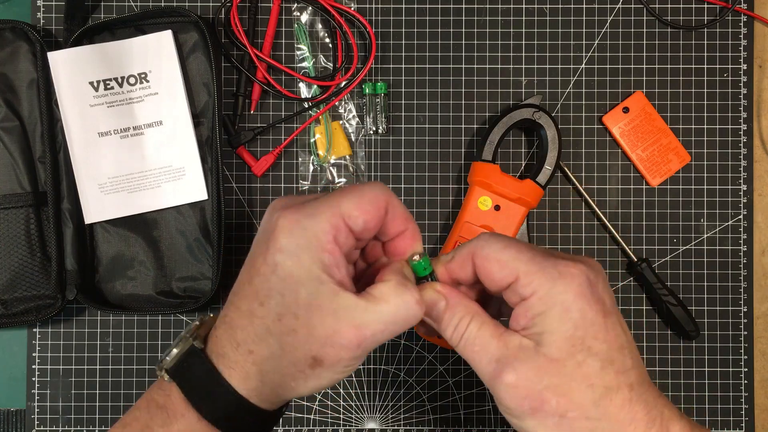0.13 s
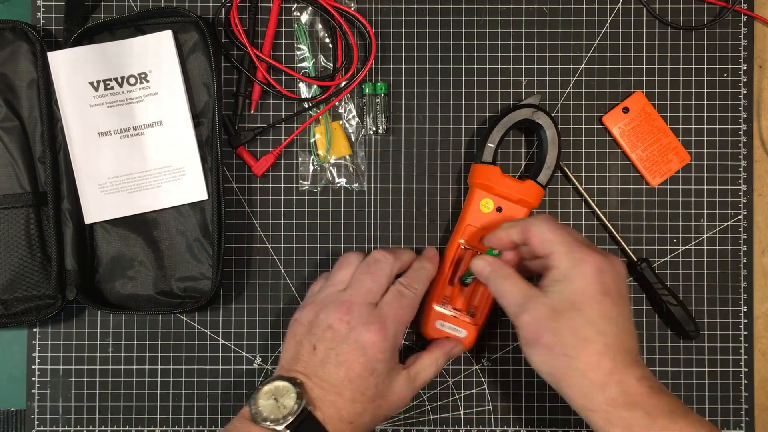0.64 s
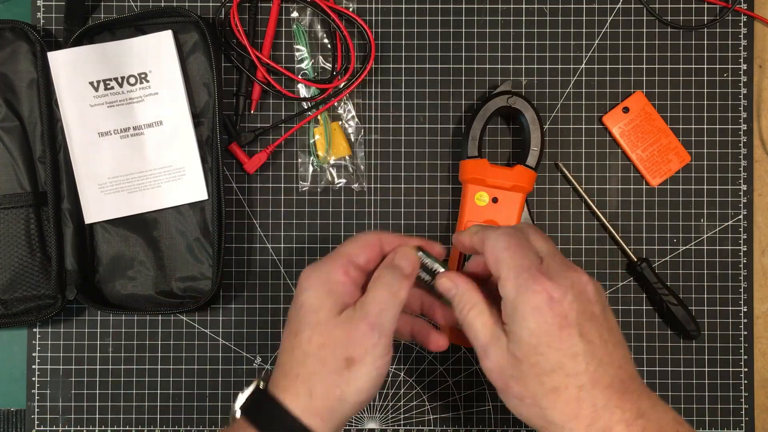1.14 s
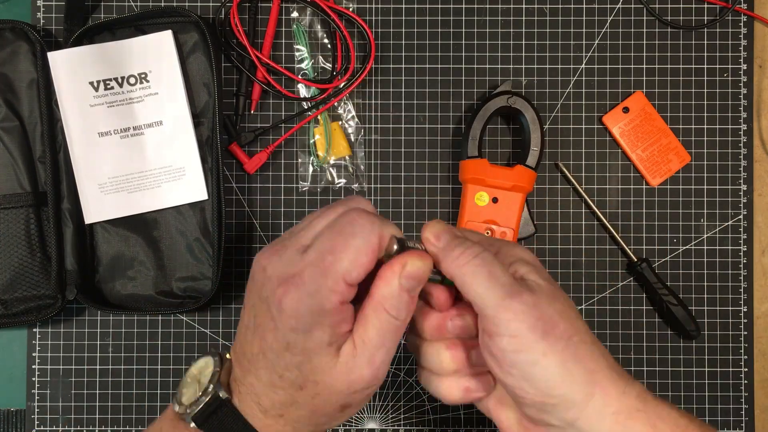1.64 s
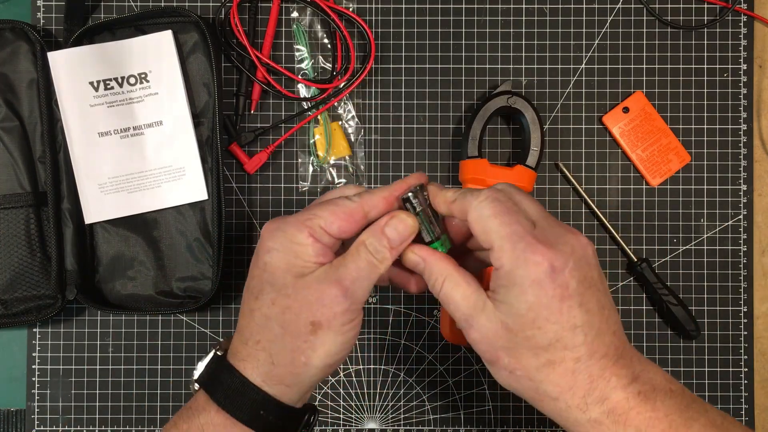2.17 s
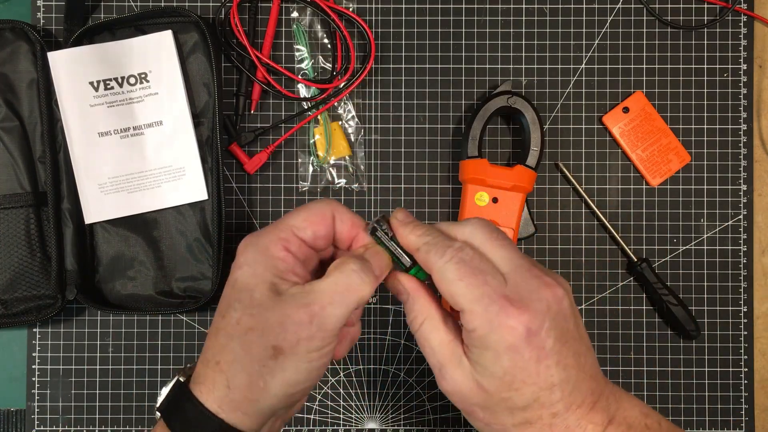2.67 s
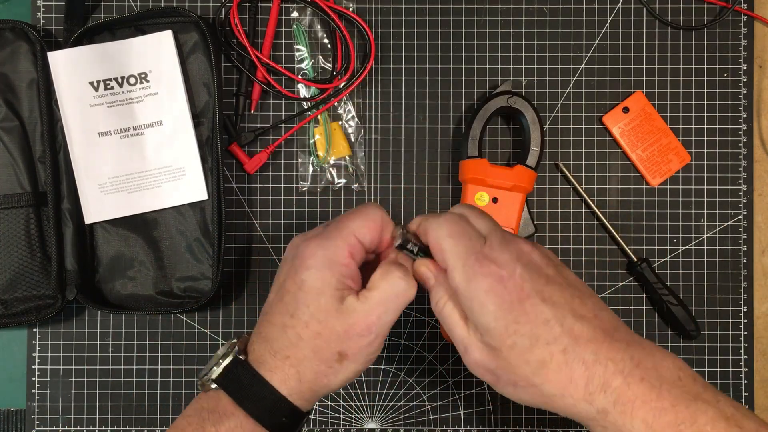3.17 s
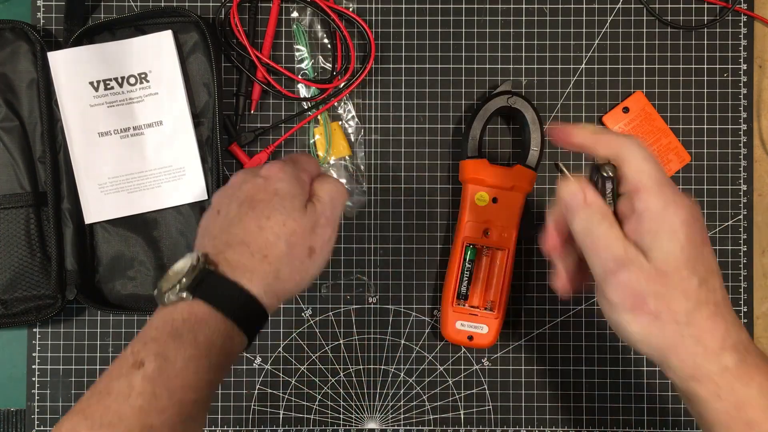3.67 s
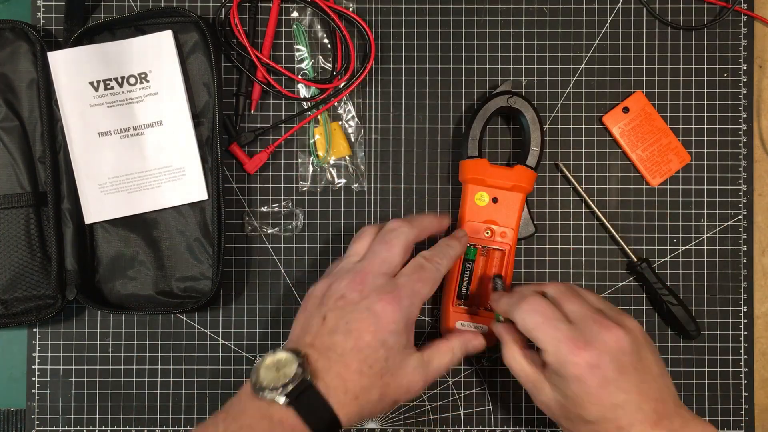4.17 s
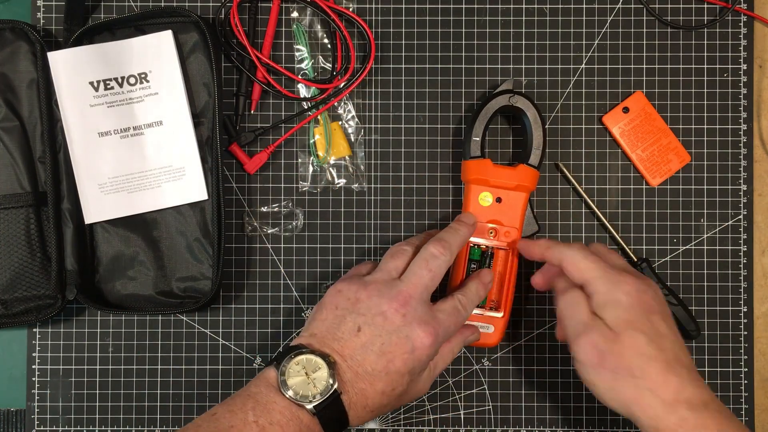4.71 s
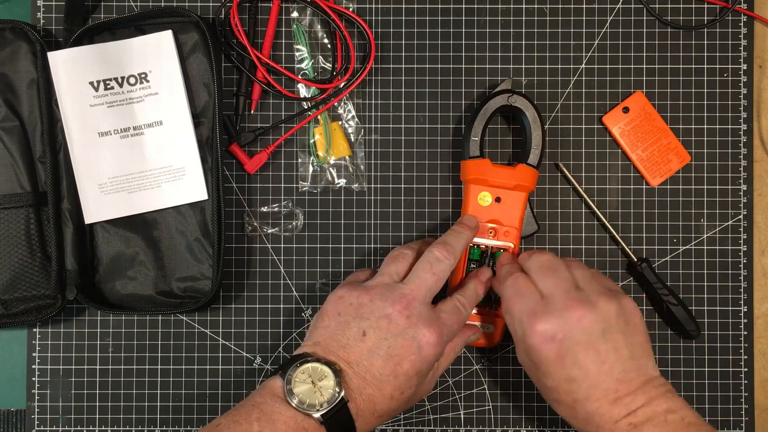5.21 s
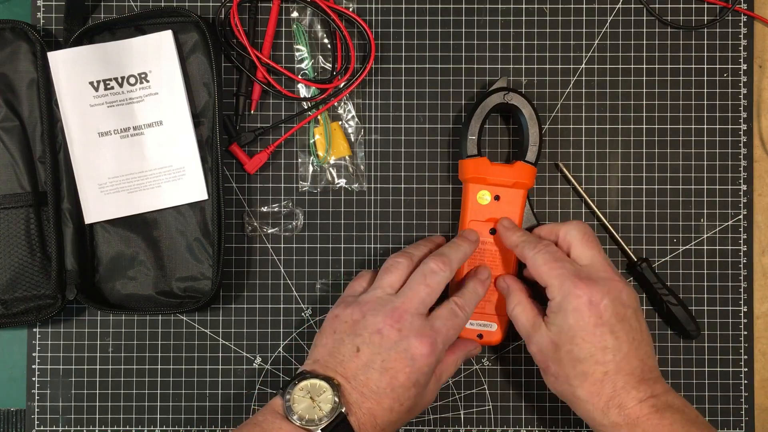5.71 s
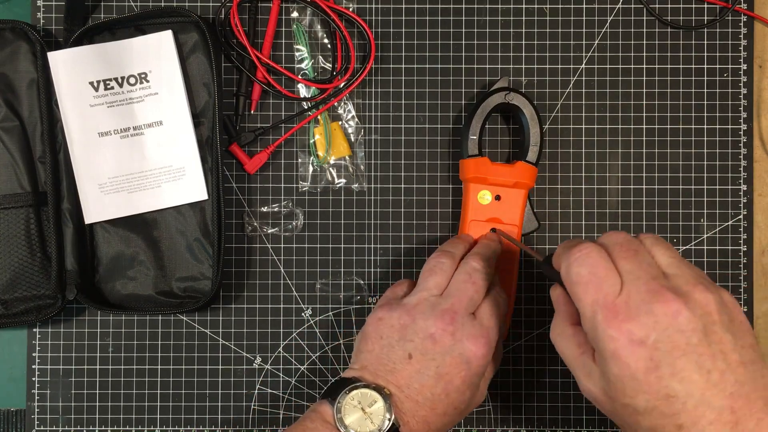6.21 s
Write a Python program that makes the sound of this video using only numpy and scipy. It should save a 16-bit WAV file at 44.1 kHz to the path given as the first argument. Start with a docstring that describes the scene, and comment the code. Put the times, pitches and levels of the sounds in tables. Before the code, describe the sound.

Thin plastic film crackles and snaps off small batteries, which then clack into a hollow plastic case with dull table thuds over a steady low hum.

```python
"""At a table with a mat, hands tear shrink film off small batteries, press them into a plastic case,
fit the lid and lift a screwdriver. Film creases and rustle are noise bursts in four bands, with a ringing patch.
Knocks excite the modes of a hollow case, and thuds bend the table top with decaying sines.
Every click comes as a short smeared burst. A mains hum and a faint room hiss lie under it."""
import sys
import numpy as np
from scipy import signal
from scipy.fft import rfft, irfft
from scipy.io import wavfile
from scipy.ndimage import uniform_filter1d

SR = 44100
rng = np.random.default_rng(int(sys.argv[2]) if len(sys.argv) > 2 else 0)


def field_ratio(decibels):
    """Amplitude ratio for a level in dB (20 dB per decade); scalars and array-likes work."""
    return 10 ** (np.asarray(decibels, dtype=float) / 20)


def to_wav(sig):
    """Store sig (one row per channel, or 1-D mono) as 16-bit WAV at the path in sys.argv[1].

    Samples outside -1..1 are clipped; the rate is SR.
    """
    pcm = np.clip(np.atleast_2d(sig), -1, 1) * 32767
    pcm = np.round(pcm).astype(np.int16)
    wavfile.write(sys.argv[1], SR, pcm.T)  # frames by channels


N = 279575
TIME = np.arange(N) / SR


def band(x, lo_hz, hi_hz, order=2):
    """Band-pass filtering: a Butterworth filter keeps the range between two edges."""
    return signal.sosfilt(signal.butter(order, [lo_hz, hi_hz], "bandpass", fs=SR, output="sos"), x)


def unit_band(x, lo_hz, hi_hz, order=2):
    """Noise gain: the energy of the impulse response sets the scale, so unit white noise leaves with rms 1."""
    click = np.zeros(4096)
    click[0] = 1
    response = band(click, lo_hz, hi_hz, order)
    return band(x, lo_hz, hi_hz, order) / np.sqrt(np.sum(response ** 2))


def walk(rate_hz):
    """Slow random modulation: levels held for 1 / rate_hz are smoothed twice; spread 1."""
    hold = int(SR / rate_hz)
    x = np.repeat(rng.standard_normal(N // hold + 1), hold)
    x = uniform_filter1d(uniform_filter1d(x, hold), hold)[:N]
    return x / np.std(x)


def grit(rate_hz, spread_db):
    """Granular excitation: dense tiny impacts of uneven size make noise of wavering level; rms 1."""
    x = rng.standard_normal(N) * field_ratio(spread_db * walk(rate_hz))
    return x / np.std(x)


def bursts(times, dbs, lengths_ms, late_ms, skirt_db, skirt_ms):
    """Energy summation of smeared clicks: each has a rounded core on a wider skirt that starts before it."""
    power, half = np.zeros(N), SR // 16
    for s, db, fall_ms in zip(times, dbs, lengths_ms):
        i = np.arange(max(int(s * SR) - half, 0), min(int(s * SR) + half, N))
        t_ms = (i / SR - s) * 1000 - late_ms
        width_ms = np.where(t_ms < 0, 2.5, max(fall_ms, 1))
        core = np.exp(-.5 * (t_ms / width_ms) ** 2)
        skirt = field_ratio(skirt_db) * np.exp(-.5 * (t_ms / skirt_ms) ** 2)
        power[i] += field_ratio(db) ** 2 * (core ** 2 + skirt ** 2)
    return np.sqrt(power)


def ring_each(push, times, pitches_hz, lows_hz, highs_hz, order):
    """Resonance: around each event the push passes a narrow band at that event's own pitch."""
    out = np.zeros(N)
    ends = (SR * np.r_[0, (times[1:] + times[:-1]) / 2, N / SR]).astype(int)  # halfway between events
    for a, b, lo, hi in zip(ends, ends[1:], lows_hz, highs_hz):
        out[a:b] = unit_band(push[a:b], lo, hi, order)
    return out


# Film creases. Each row: time in seconds, sizzle level in dB before trims,
# snap level in dB relative to the sizzle, ring level in dB relative to the sizzle before trims.
FILM_CREASES = [(0.027, -23, -13.5, -15), (0.113, -43.5, -16, -33), (0.277, -31, -13, -40),
                (0.296, -32.5, -15, -31), (0.344, -33, -8, -29), (0.361, -27.5, -11.5, -29),
                (0.3835, -34.5, -5, -36), (0.4005, -36.5, -5.5, -16.5), (0.474, -42, -14, -32),
                (0.5154, -34, -7, -19), (1.166, -56.5, 3.5, -12), (1.5076, -50, 8, 10),
                (1.5801, -19, -12.5, -23), (1.63, -27, -16, -39), (1.701, -27, -14, -22.5),
                (1.737, -36, -1.5, -13), (1.7817, -32, -12, -13.5), (2.0084, -39.5, -4, -11),
                (2.046, -33.5, 1, -5.5), (2.103, -39.5, -3, -11), (2.151, -33, -5, -9.5),
                (2.291, -43.5, -2, -7), (2.391, -32.5, -5, -11), (2.4686, -21.5, -3, -6.5),
                (2.542, -38, -3, -12), (2.64, -46.5, 2, -8), (2.724, -38, 1.5, -30), (2.765, -38, 2, -28),
                (2.89, -44.5, 2, 1), (2.942, -25.5, 1.5, -18.5), (2.97, -39, 4.5, 4),
                (2.992, -51.5, -4, 12.5), (3.023, -42, 6, -29), (3.0966, -36.5, 5, -12),
                (3.145, -19.5, -3, -19.5), (3.21, -27.5, 4, 2), (3.223, -40.5, 17, 13.5),
                (3.271, -34.5, -1, -24), (3.323, -47, 7.5, 2.5), (3.373, -20, -5.5, -15.5),
                (3.431, -26.5, -4, -13), (3.482, -33.5, 3, -0.5), (3.513, -21.5, -3, -14),
                (3.5873, -22.5, -8.5, -15.5), (3.6434, -23.5, 0, -5.5), (3.6623, -27, -2, -4),
                (3.747, -41, -18, -29), (3.829, -50.5, 9.5, -14)]
# Film rustle between creases. Each row: time in seconds, level in dB before trims.
FILM_RUSTLE = [(.1, -78), (.25, -72.5), (.33, -56.5), (.44, -78), (.54, -58.5), (.62, -78.5), (1.28, -75.5),
               (1.4, -68), (1.65, -59.5), (1.95, -60), (2.15, -60.5), (2.24, -70.5), (2.44, -60),
               (2.6, -65), (2.68, -59.5), (2.73, -53.5), (3.03, -54), (3.065, -57), (3.11, -51.5),
               (3.3, -53.5), (3.57, -44), (3.72, -64), (3.82, -53), (3.9, -88)]
# Sizzle, snap, body and low body of the film. Each row: lower edge in Hz, upper edge in Hz.
FILM_RANGES = [(10500, 16300), (4800, 10500), (2200, 4800), (950, 2200)]
# Flat film between the fingers, as the grip shifts. Each row: time in seconds, pitch in Hz before scatter.
FILM_PATCH = [(.03, 3500), (1.5, 2170), (1.75, 5000), (2.47, 2260), (2.7, 5470), (2.97, 3400), (2.99, 1510),
              (3.2, 4900), (3.49, 3680), (3.65, 6000)]


def film():
    """Buckling: creases in thin stiff film snap in flurries; many smaller ones crackle at random in the gaps."""
    s, peak_db, snap_db, ring_db = np.transpose(FILM_CREASES)
    patch_hz = np.interp(s, *np.transpose(FILM_PATCH))
    patch_hz = patch_hz * np.exp(0.091 * rng.standard_normal(len(s)))  # scatter as a share of the pitch

    def flurry(db):
        lengths_ms = np.full(len(s), 4.5)
        shape = bursts(s, db - 7.5, lengths_ms, late_ms=2.94, skirt_db=-13.0, skirt_ms=10.7)
        return grit(900, 1.02) * shape

    when, size, *tints = np.transpose(rng.random((640, 10)))
    when = when * N / SR
    rustle_points = np.transpose(FILM_RUSTLE)
    small_db = np.interp(when, *rustle_points) - 3.5 * np.log(size + .01)  # few large, many tiny
    rustle_db = np.interp(TIME, *rustle_points)

    out = np.zeros(N)
    crease_trims_db = (0, snap_db, ring_db - 3.5, ring_db - 11.0)
    rub_trims_db = (1, -1.5, -6, -11)
    tints = iter(tints)
    for (lo, hi), db, rub_db in zip(FILM_RANGES, crease_trims_db, rub_trims_db):
        middle = np.sqrt(lo * hi)
        for low_hz, high_hz in [(lo, middle), (middle, hi)]:  # each half has its own shade
            shade_db = small_db + rub_db - 1 - 15 * next(tints)
            small = bursts(when, shade_db, np.full(len(when), 2), late_ms=0, skirt_db=-13, skirt_ms=8)
            finest = field_ratio(rustle_db + rub_db - 13 + 6.0 * walk(60))  # finest ticks run together
            rustle = grit(1000, 0.81) * np.hypot(small, finest)
            creases = flurry(peak_db + db - 3.0 + 2.1 * rng.standard_normal(len(s)))
            out += unit_band(creases + rustle, low_hz, high_hz, order=3)
    # the flat patch beside each crease rings at a pitch set by its size
    push = flurry(peak_db + ring_db)
    return out + ring_each(push, s, patch_hz, patch_hz / 1.16, patch_hz * 1.16, order=2)


# Knocks on the case. Each row: time in seconds, level in dB before trims,
# tick level in dB relative to that level before trims, pitch of the spot struck in Hz.
CASE_KNOCKS = [(0.672, -32, -43, 560), (0.705, -40, -34, 1650), (0.76, -45.5, -31, 640),
               (0.813, -54, -4, 2600), (0.936, -32.5, -12.5, 3140), (1.021, -41, 11.5, 3200),
               (1.049, -49, -9, 1290), (1.07, -44, -0.5, 3010), (4.255, -30.5, -13, 2940),
               (4.27, -43.5, -30, 780), (4.354, -28.5, -33, 2510), (4.387, -39, -16, 1720),
               (4.576, -47, -28, 865), (4.622, -50.5, -17, 870), (4.662, -54, -5.5, 2370),
               (4.728, -48, -11, 3920), (5.086, -46.5, -21, 1750), (5.145, -49, -15, 3930),
               (5.215, -32.5, 8.5, 1990), (5.345, -35, 1, 1970), (5.367, -44.5, 1, 2400),
               (5.391, -40.5, -1.5, 2240), (5.506, -50, -23, 2000), (5.587, -23, -14, 2250),
               (5.707, -44.5, 2.5, 2300), (5.843, -51, -27, 770), (6.242, -61, 4.5, 2220)]
# Wall modes of the plastic case. Each row: pitch in Hz, level in dB before trims.
CASE_MODES = [(900, -6.5), (1520, -1), (1760, -4.5), (2160, 2), (2350, 0), (2700, 0), (3200, -2.5),
              (4150, -2.5), (4900, -2)]


def case():
    """Modal excitation: batteries, springs and lid knock a hollow shell into wall modes, clack and tick."""
    s, peak_db, tick_db, spot_hz = np.transpose(CASE_KNOCKS)
    hard_db = -31
    # a hard knock is short; softer ones fall more slowly, up to 8.8 ms
    lengths_ms = np.minimum(5.16 + 0.5 * (hard_db - peak_db), 8.8)

    def blow(db):
        return bursts(s, db, lengths_ms, late_ms=2.7, skirt_db=-9.5, skirt_ms=8.1)

    contact = grit(600, 2.7)  # several contacts to a knock
    # the spot struck rings briefly
    out = ring_each(contact * blow(peak_db - 14), s, spot_hz, spot_hz - 60, spot_hz + 60, order=1)

    grip = rng.standard_normal((len(s), len(CASE_MODES)))  # the fingers damp other modes at every knock
    for k, (hz, db) in enumerate(CASE_MODES):
        near_db = -7 * np.abs(np.log2(hz / spot_hz))  # the spot struck favours modes near its own pitch
        push = contact * blow(peak_db + db + near_db + 1.5 * grip[:, k] - 10)
        out = out + (-1) ** k * unit_band(push, hz / 1.04, hz * 1.04, order=1)

    # the part scrapes on into place
    slide_db = np.minimum(peak_db, hard_db) - 24
    slide = bursts(s, slide_db, np.full(len(s), 16), late_ms=11, skirt_db=-3, skirt_ms=18.3)
    out = out + unit_band(slide * grit(300, 3.5), 800, 4500)

    # many damped modes blur into a dull clack
    clack = contact * blow(peak_db - 11.5 - 1.32 * np.log2(spot_hz / 1500))
    tick = grit(500, 2.9) * blow(peak_db + tick_db - 6.0)
    return out + unit_band(clack, 170, 1100, order=1) + unit_band(tick, 3100, 15400)


# Thuds through the table top. Each row: start in seconds, level in dB before trims,
# board ring level in dB relative to the swing.
TABLE_THUDS = [(0.671, -42, 5), (0.686, -44, -3.5), (0.938, -29, -0.5), (4.287, -46.5, -9),
               (4.372, -43.5, -3), (4.542, -54, -8), (4.584, -48.5, -8.5), (4.735, -48.5, -16),
               (5.213, -36, -8.5), (5.342, -41, -6.5), (5.525, -39.5, -8.5), (5.59, -49, -1),
               (5.696, -41, -8), (5.805, -38, -12.5), (5.849, -35, -9.5), (6.233, -62.5, 9.5)]


def table():
    """Damped bending: each push gives a low swing that sinks in pitch and a shorter board ring, both eased in."""
    out, t = np.zeros(N + SR), np.arange(SR // 5) / SR
    sag_s = 0.0307  # time constant of the sinking pitch
    rise = 1 - np.exp(-(t / 0.0036) ** 2)
    chances = rng.standard_normal((len(TABLE_THUDS), 2))
    for (s, db, ring_db), (swing_chance, ring_chance) in zip(TABLE_THUDS, chances):
        start_hz = 150 * (1 + 0.12 * swing_chance)
        cycles = start_hz * sag_s * (1 - np.exp(-t / sag_s))
        swing = (1 - np.exp(-t / 0.007)) * np.sin(2 * np.pi * cycles) * np.exp(-t / 0.013)
        board_hz = 210 * (1 + 0.15 * ring_chance)
        ring = np.sin(2 * np.pi * board_hz * t) + np.sin(2 * np.pi * 310 * t)
        ring = ring * np.exp(-t / 0.0076)
        out[int(s * SR):][:len(t)] += field_ratio(db + 11.5) * rise * (swing + field_ratio(ring_db) * ring)
    return band(out[:N], 28, 2100, order=1)


# High overtones of the hum. Each row: frequency in Hz, level in dB rms.
HUM_OVERTONES = [(1981, -84.5), (2579, -84.5), (2934, -87)]


def hum():
    """Phase modulation: a mains tone wavers slightly in level and phase, with faint high overtones."""
    hum_hz, hum_db = 60, -42
    turn = 2 * np.pi * TIME
    out = field_ratio(hum_db + 0.38 * walk(14)) * np.sin(hum_hz * turn + 0.052 * walk(20))
    for hz, db in HUM_OVERTONES:
        out = out + field_ratio(db) * np.sin(hz * turn + 0.74 * walk(45))
    return np.sqrt(2) * out  # peak of a sine over its rms


# Spectrum of the hiss. Each row: frequency in Hz, relative density in dB per Hz.
ROOM_SPECTRUM = [(45, -22), (95, -9), (160, -16), (320, -15.5), (450, -23), (1200, -26), (2800, -31.5),
                 (4000, -36), (16000, -36.5)]


def room():
    """Spectral shaping: white noise weighted by frequency makes steady room and microphone hiss."""
    hz = np.fft.rfftfreq(N, 1 / SR)
    point_hz, point_db = np.transpose(ROOM_SPECTRUM)
    gain = field_ratio(np.interp(np.log(hz + 1), np.log(point_hz), point_db))
    x = irfft(rfft(rng.standard_normal(N)) * gain, N)
    return x / np.std(x) * field_ratio(-66)  # dB rms


def scene():
    """Superposition: the pressures of all sources add at one microphone."""
    return (film() + case() + table() + hum() + room())[None]


# Dips from the microphone's housing. Each row: centre in Hz, width in Hz, gain at the centre in dB.
HOUSING_DIPS = [(4980, 710, -7), (10650, 320, -10)]


def housing(x):
    """Cancellation: subtracting part of a band dips the response there, as the microphone's housing does."""
    for hz, width, db in HOUSING_DIPS:
        x = x - (1 - field_ratio(db)) * band(x, hz - width / 2, hz + width / 2, order=1)
    return x


def band_limit(x):
    """A steep low-pass at the top of the band."""
    return signal.sosfilt(signal.butter(12, 16300, fs=SR, output="sos"), x)


def record(dry):
    """Band limiting: the recorder cuts the top above 16100 Hz, and the microphone's housing dips two bands."""
    low_pass = signal.ellip(8, .2, 70, 16100, fs=SR, output="sos")
    mix = housing(signal.sosfilt(low_pass, dry))
    return band_limit(mix)


dry = scene()
out = record(dry)
to_wav(out)
```